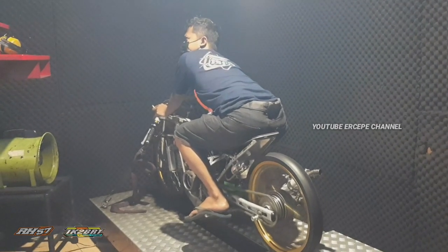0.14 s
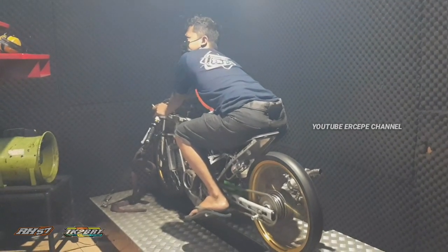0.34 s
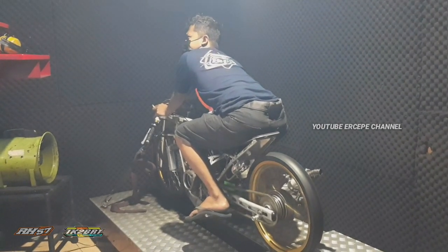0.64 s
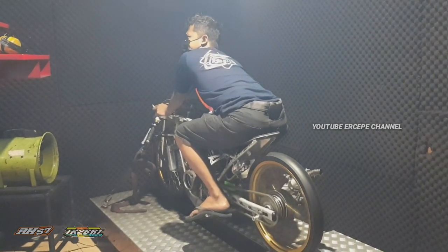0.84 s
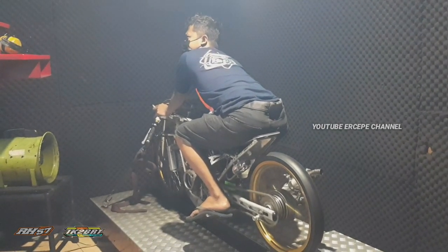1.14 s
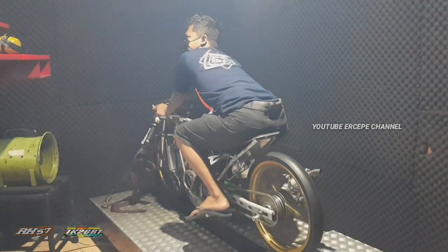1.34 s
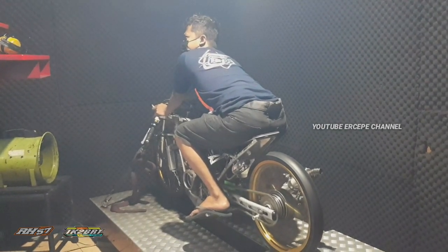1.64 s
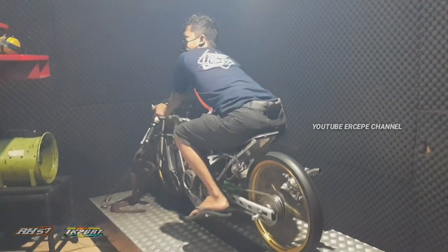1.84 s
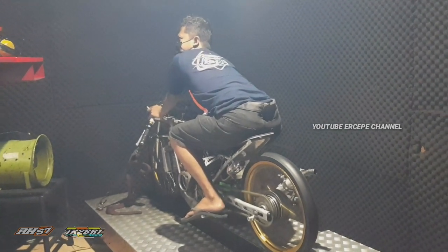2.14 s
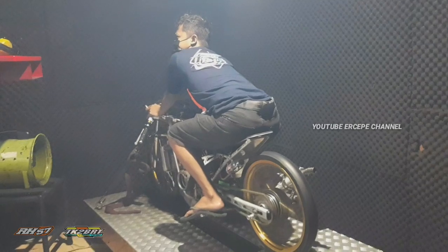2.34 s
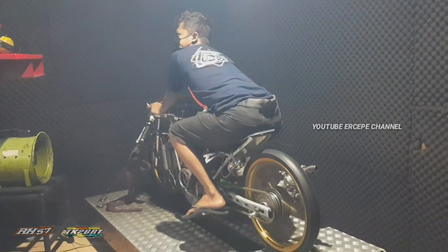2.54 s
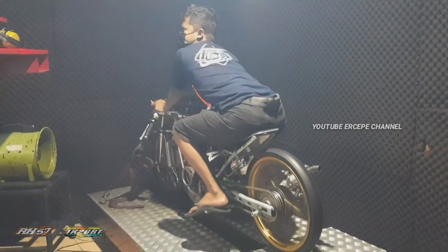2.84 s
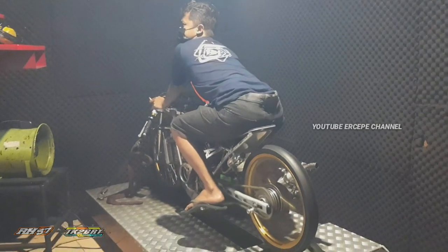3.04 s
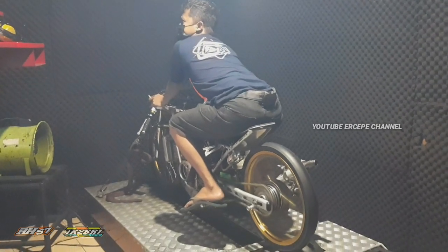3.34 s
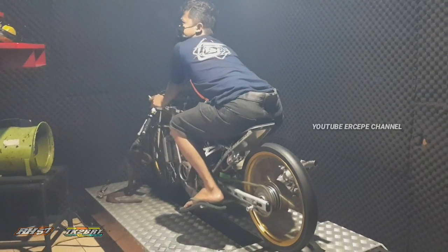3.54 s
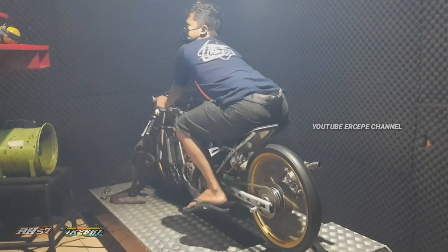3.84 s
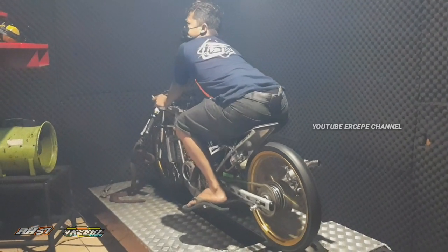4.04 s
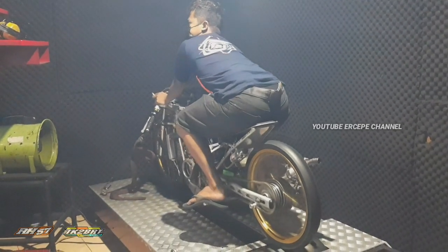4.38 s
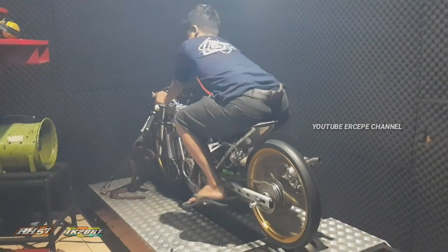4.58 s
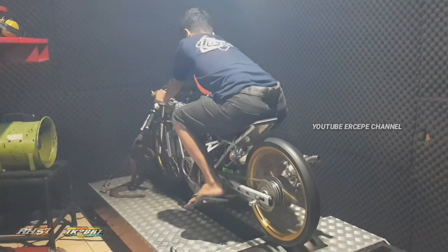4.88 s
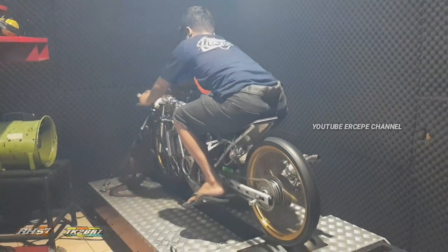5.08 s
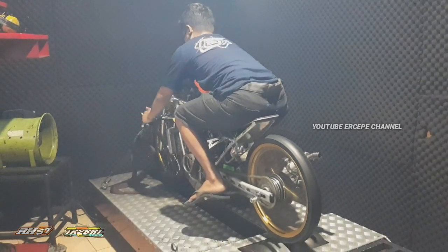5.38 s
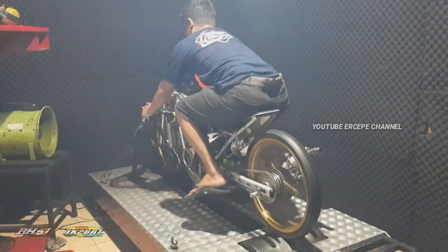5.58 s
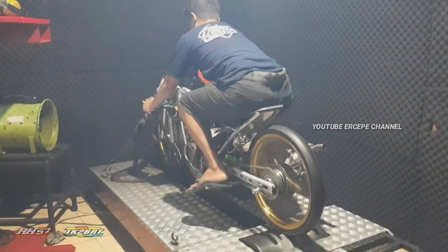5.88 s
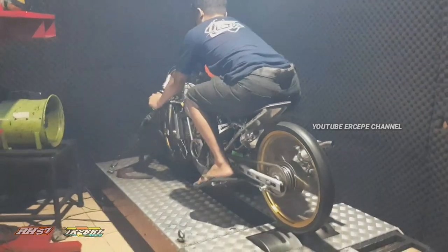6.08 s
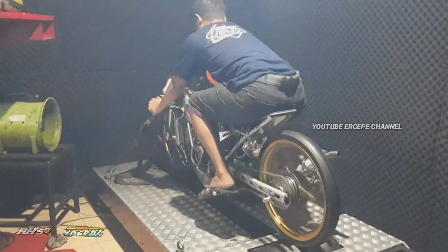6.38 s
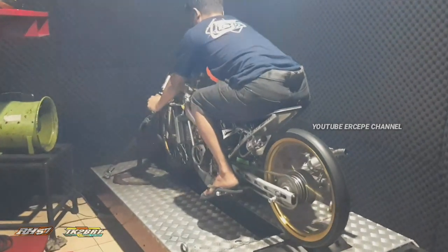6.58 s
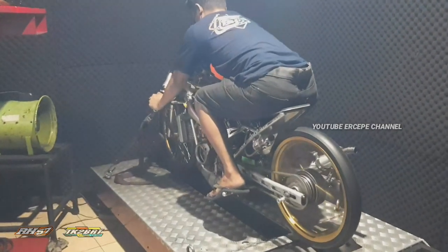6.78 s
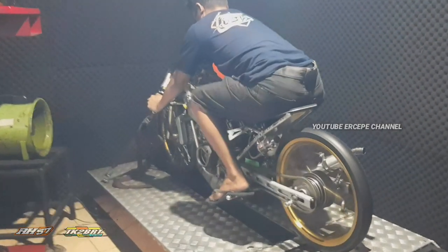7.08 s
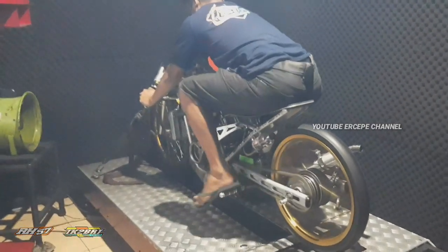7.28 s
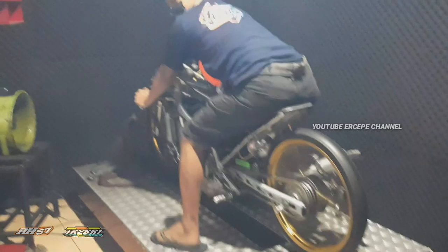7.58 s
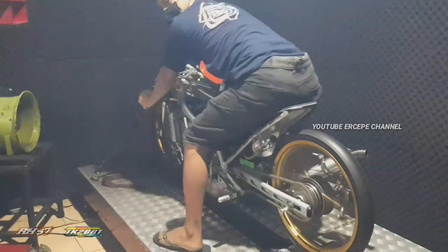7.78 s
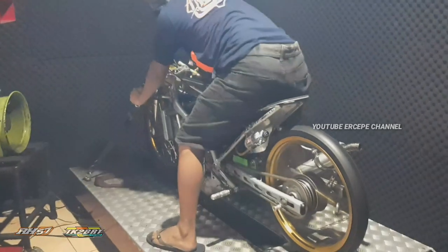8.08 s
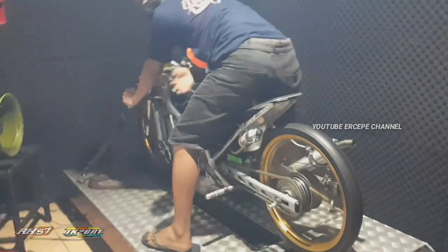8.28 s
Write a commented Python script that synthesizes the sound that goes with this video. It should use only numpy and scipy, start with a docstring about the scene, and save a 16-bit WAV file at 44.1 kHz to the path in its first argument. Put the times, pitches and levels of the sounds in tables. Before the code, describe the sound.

Close in a small padded room, a single-cylinder motorcycle pulls hard on a roller, its raspy buzzing howl climbing for about three seconds. The throttle snaps shut with a short low boom and a quick sag. A thinner, chattering whine holds high, sinking only slightly for three seconds. Then the load comes off and the pitch slides down by more than an octave, growing rougher, with ringing metal rattles. Stereo, dry, very short reflections.

```python
"""A single-cylinder motorcycle pulls hard on a roller dynamometer, heard by two microphones in a padded booth.
The revs climb, the throttle snaps shut, the heavy roller drags the engine on, and then the revs fall away.
Each firing is a pulse that rings pipe and booth, so its overtones sweep through fixed resonances.
Shaped noise gives gas rush and clatter; single overtones, rattles, knocks and one thump lie on top."""
import sys
import numpy as np
from scipy import signal
from scipy.fft import rfft, irfft, next_fast_len
from scipy.io import wavfile
from scipy.ndimage import uniform_filter1d

SR = 44100
rng = np.random.default_rng(int(sys.argv[2]) if len(sys.argv) > 2 else 0)


def master(y):
    """Save y as 16-bit WAV."""
    cut = np.clip(np.atleast_2d(y).T, -1, 1)
    pcm = np.round(cut * 32767)  # scale
    wavfile.write(sys.argv[1], SR, pcm.astype(np.int16))


N = 371315
TIME = np.arange(N) / SR
SIZE = next_fast_len(N + 8192)  # FFT length, with room for tails
HZ = np.fft.rfftfreq(SIZE, 1 / SR)
EDGE_HZ = 15450  # upper band limit
RELEASE_S = 6.05  # the load comes off

# Resonances and nulls of pipe and booth with the throttle shut.
# Each row: frequency in Hz, width in Hz, gain in dB at the left microphone, gain in dB at the right.
COAST_MODES = [(377, 43, 5.5, 3.5), (349, 27, 5, 5), (413, 12, -39, -26), (538.6, 21, 6, 12),
               (605, 11, 8, -5), (740, 17, 12, -46), (1022, 47, -14.5, 18.5), (1091, 10.2, -40, 9),
               (1186, 44, 9, 12.5), (1231.6, 122, 13.5, 12.5), (1354, 33, -18, -18),
               (1390, 310, -0.5, -9.5), (1654, 430, -10, -6), (1740, 51, 17.5, -5), (1744, 18, -13, 4),
               (1769, 58, 8, 7), (1923, 127, -32, -14.5), (2346, 130, 15, -13), (2390, 130, -9, -43),
               (2710, 39, 1, 1), (2850, 73, 6, 8), (3205, 160, -13, -17), (3580, 21, 12, -36),
               (3970, 300, 8, 9), (4260, 190, -14.5, -16), (4635, 150, 9.5, 3), (5000, 290, 6.5, 4),
               (5900, 150, 14, -2)]
# Resonances and nulls as the revs fall away.
# Each row: frequency in Hz, width in Hz, gain in dB at the left microphone, gain in dB at the right.
SLOW_MODES = [(201.4, 18, 11, 11), (302, 27, 7.5, 6), (337, 12, -13, -12), (371, 9.9, 8, 8),
              (531, 7.7, 9.5, 4.5), (562.6, 20, 9.5, 7.5), (627, 13, 5.5, 6.5), (739, 222, -15.5, -14),
              (880, 8.2, -5, -7), (976, 19, -34, -36), (1073, 22, -25, -3), (1166, 83, 5, 9.5),
              (1220, 55, 13.5, 11), (1304, 53, -5, -19), (1325, 227, -17, -20), (1413, 430, -12.5, -12.5),
              (1494, 23, 14.5, 22), (1610, 74, 15.5, 12), (1730, 140, 7, 1), (2070, 120, -6, 7),
              (2670, 340, 1.5, -7), (3320, 130, -22, -3.5), (3850, 64, 1, -6), (4130, 260, 1.5, 4.5),
              (4530, 290, -7, -17), (5100, 262.0, -8, -0.5), (5350, 300.0, 9, 0)]


def amp(db):
    """Decibels to gain."""
    return 10 ** (np.asarray(db) / 20)


def unit(x):
    """Scales to rms 1."""
    return x / np.sqrt(np.mean(x ** 2) + 1e-20)


def bump(at_s, width_s):
    """A smooth swell of height 1."""
    return np.exp(-((TIME - at_s) / width_s) ** 2)


def ramp(start_s, length_s):
    """Rises in a straight line from 0 to 1."""
    return np.clip((TIME - start_s) / length_s, 0, 1)


def curves(rows):
    """Each column after the time column, at every sample."""
    s, *columns = np.transpose(rows)
    return [np.interp(TIME, s, column) for column in columns]


def spectrum(points):
    """Joins points on a log-frequency axis."""
    hz, value = np.transpose(points)
    return np.interp(np.log(HZ + 1), np.log(hz), value)


def filtered(x, response):
    """Applies a frequency response."""
    return irfft(rfft(x, SIZE) * response, SIZE)[..., :N]


def above(hz, order=4):
    """Smooth high-pass response."""
    return HZ ** order / (HZ ** order + float(hz) ** order)


def wander(rate_hz):
    """Random drift of rms 1, slower than the given rate."""
    return unit(filtered(rng.standard_normal(N), 1 - above(rate_hz)))


def resonances(modes):
    """Gain in dB of bell-shaped peaks and nulls, one row per microphone."""
    total_db = 0
    for hz, width_hz, left_db, right_db in modes:
        bell = 1 / (1 + (2 * (HZ - hz) / width_hz) ** 2)
        total_db = total_db + np.array([[left_db], [right_db]]) * bell
    return total_db


def causal(db):
    """The response with this gain that rings only after it is struck (minimum phase)."""
    cepstrum = irfft(np.log(amp(db)), SIZE)
    cepstrum[:, 1:SIZE // 2] *= 2
    cepstrum[:, SIZE // 2 + 1:] = 0
    return np.exp(rfft(cepstrum))


def engine_speed():
    """Firings per second: the climb, the long coast with the roller, the fall."""
    # Engine speed under full throttle. Each row: time in seconds, firings per second.
    pull_speed = [(0.0, 132.9), (0.12, 132.7), (0.45, 140.9), (1.026, 158.8), (1.31, 168.9), (1.43, 174.8),
                  (2.147, 198.3), (2.594, 211.0), (2.875, 217.0)]
    # Engine speed once the load is off. Each row: time in seconds, firings per second.
    fall_speed = [(6.02, 177.8), (6.26, 160.5), (6.494, 146.9), (6.807, 130.0), (7.148, 114.8),
                  (7.526, 101.2), (8.42, 73.9)]
    # throttle shut: the revs drop to the pace of the roller, which loses a steady share of its speed
    roller_hz, roller_loss_per_s, drop_s = 204.8, 0.04485, 0.07
    top_s, top_hz = pull_speed[-1]
    since_s = np.maximum(TIME - top_s, 0)
    roller = roller_hz * np.exp(-roller_loss_per_s * since_s)
    drop = (top_hz - roller_hz) * np.maximum(1 - since_s / drop_s, 0)
    # slack in the chain lets the revs sag once before the roller takes hold
    sag = 6.5 * bump(3.01, width_s=0.052)
    (climb,), (fall,) = curves(pull_speed), curves(fall_speed)
    return np.select([TIME < top_s, TIME < fall_speed[0][0]], [climb, roller + drop - sag], fall)


def crank_turns(speed, shut, released):
    """Engine cycles turned so far, with wheel ripple, surges of the chain and small random drift."""
    firings_per_wheel_turn = 10.3
    wheel_phase = 2 * np.pi * np.cumsum(speed) / SR / firings_per_wheel_turn
    # the rear wheel nudges the revs once a turn; shares of the speed
    wheel = (1 - shut) * 0.0032 * np.sin(wheel_phase)
    # the revs surge gently, 5.15 times a second, while the roller drives the chain
    surge = shut * (1 - released) * 0.0025 * np.cos(2 * np.pi * 5.15 * (TIME - 3.85))
    drift = 0.000836 * wander(25.7)
    lead_s = 0.008  # the crankshaft runs ahead of its sound by the time spent in pipe and booth
    return np.cumsum(speed * (1 + wheel + surge + drift)) / SR + lead_s * (speed - speed[0])


def firings(turns, speed, uneven, jitter_ms):
    """One sharp pulse per engine cycle, each a little different in strength and timing."""
    at = np.interp(np.arange(1, int(turns[-1])), turns, np.arange(N))
    strength, late = rng.standard_normal((len(at), 2)).T
    # dividing by the speed keeps each overtone equally strong at any revs
    size = (1 + uneven * strength) * SR / speed[at.astype(int)] / np.sqrt(2)
    at = at + late * jitter_ms / 1000 * SR
    # windowed sinc: places a pulse between samples
    near = at.astype(int)[:, None] + np.arange(-8, 9)
    offset = near - at[:, None]
    shape = np.sinc(offset) * np.cos(np.pi * offset / 18) ** 2
    return np.bincount(np.clip(near, 0, N - 1).ravel(), (size[:, None] * shape).ravel(), N)


def wavering(pulses):
    """Faint echoes of drifting strength make each overtone swell and fade on its own."""
    out = pulses
    for delay_ms in (2.3, 4.1, 9.7):
        echo = filtered(pulses, np.exp(-2j * np.pi * HZ * delay_ms / 1000))
        out = out + 0.15 * wander(5) * echo
    return out


def smear():
    """Reflections hold each band back by its own few ms, which spreads a pulse over its cycle."""
    delay_s = .004 + .0025 * np.sin(2 * np.pi * HZ / 830) + .0015 * np.sin(2 * np.pi * HZ / 2170)
    return np.exp(-2j * np.pi * np.cumsum(delay_s) * SR / SIZE)


def microphones(lag_ms, from_hz=1900):
    """Treble reaches the right microphone later; the bass of the booth moves both together."""
    late = np.exp(-2j * np.pi * HZ * lag_ms / 1000 * above(from_hz, order=6))
    return np.array([np.ones(len(HZ)), late])


def booth(lag_ms, t60=0.38):
    """Direct sound plus a short spray of wall reflections."""
    # Share of the pulses' power scattered by the walls. Each row: frequency in Hz, share from 0 to 1.
    scatter = [(200, 0.08), (1200, 0.14), (2200, 0.17), (3500, 0.24), (7000, 0.6)]
    t = TIME[:SR // 5]
    tail = rng.standard_normal((2, len(t))) * amp(-60 * t / t60)
    tail /= np.linalg.norm(tail, axis=1, keepdims=True)
    share = np.clip(spectrum(scatter), 0, 1)
    return np.sqrt(1 - share) * microphones(lag_ms) + np.sqrt(share) * rfft(tail, SIZE)


def exhaust(pulses, effort, tone, modes, top_hz, lag_ms):
    """Pulses take their level and treble from the effort, then ring the pipe and the booth."""
    level_db, treble_db = effort
    treble = filtered(pulses, above(2000))
    drive = amp(level_db) * (pulses - treble + amp(treble_db) * treble)
    band = above(70, order=6) * (1 - above(top_hz, order=8))
    colour = causal(spectrum(tone) + resonances(modes)) * band
    return filtered(drive, colour * smear() * booth(lag_ms))


def rush(turns, levels, colour, modes, ring, throb, grain_db, lag_ms=0.38):
    """Noise that puffs once a cycle and rings the same resonances more weakly."""
    # Likeness of the noise at the two microphones. Each row: frequency in Hz, correlation from -1 to 1.
    likeness = [(60, 1), (300, 0.5), (1200, -0.55), (4000, 0.17), (10000, 0.24)]
    # Lean of the noise to one side. Each row: frequency in Hz, left minus right in dB.
    lean = [(60, 4), (300, 0.5), (1200, 1.5), (2500, -3), (6000, 3), (14000, 3.5)]
    grain = amp(grain_db * (wander(140) + .5 * wander(26)))
    puff = (1 + throb * np.cos(2 * np.pi * turns)) * grain
    first, second = rfft(rng.standard_normal((2, N)) * puff, SIZE)
    same = np.clip(spectrum(likeness), -1, 1)
    pair = np.array([first, same * first + np.sqrt(1 - same ** 2) * second]) * microphones(lag_ms)
    ring_db = resonances(modes)
    ring_db = ring_db - uniform_filter1d(ring_db.mean(0), size=6000)  # keeps the broad colour
    db = spectrum(colour) + ring * ring_db + spectrum(lean) * np.array([[.5], [-.5]])
    pair = pair * amp(db) * above(24)
    # three bands, each with its own level curve: roar, clatter, hiss
    over_roar, over_clatter = above(2200, order=12), above(7500, order=12)
    bands = [1 - over_roar, over_roar - over_clatter, over_clatter * (HZ < EDGE_HZ)]
    out = 0
    for band, level_db in zip(bands, levels):
        out = out + amp(level_db) * unit(irfft(pair * band, SIZE)[:, :N])
    return out


def under_load(speed, *laws):
    """Levels in dB that follow the revs and step up or down where the pipe comes into tune."""
    band_hz, band_width_hz = 170.7, 6.9  # firing rate of the power band
    octaves = np.log2(speed / band_hz)
    in_band = .5 + .5 * np.tanh((speed - band_hz) / band_width_hz)
    return [db + per_octave_db * octaves + band_db * in_band for db, per_octave_db, band_db in laws]


def off_load(speed, *laws):
    """Levels in dB that change by a fixed amount per octave of revs."""
    octaves = np.log2(speed / 129.2)
    return [db + per_octave_db * octaves for db, per_octave_db in laws]


def pull(turns, speed):
    """Full throttle: hard, hot pulses and a roar of gas."""
    # Broad colour of the pulses. Each row: frequency in Hz, relative overtone level in dB.
    power_tone = [(100.0, -33.5), (150.0, -43), (250.0, -48), (400.0, -41.5), (560.0, -29), (800.0, -35),
                  (1200.0, -10), (1800.0, -21.5), (2600.0, -28), (3800.0, -29), (5200.0, -40),
                  (7000.0, -46)]
    # Resonances and nulls of pipe and booth.
    # Each row: frequency in Hz, width in Hz, gain in dB at the left microphone, gain in dB at the right.
    power_modes = [(205, 9.1, -2, -21), (262, 68, 15, 5), (416, 13.5, -16, -3.5), (490.4, 4.4, -10, -40),
                   (588, 16.6, -15, 2.5), (677, 86, 9.5, 3), (820, 100, -6, 3), (867, 21, 17, 4.5),
                   (1040, 7.9, -2, -24), (1076, 25, -17.5, -1), (1181, 90, -5.5, -5.5),
                   (1226, 59, -5.5, -14.5), (1324, 66, 1.5, -7), (1541, 286, -23, -10.5),
                   (1628, 108, 16.5, 10), (1795, 8.9, 3, 12), (1964, 113, 6.5, -13.5), (2125, 39, -1, 2),
                   (2200, 160, -23, 8.5), (2382, 37, 10, -20), (2675, 170, 6, -7), (2710, 41, -14.5, -3),
                   (2870, 380, 6, 0), (3110, 380, -21.5, 0.5), (3300, 510, -3.5, -7),
                   (3387, 226, 7.5, 12.5), (3640, 310, -1, -11.5), (4800, 220, -11, 4.5),
                   (5620, 190, 10.5, 4)]
    # Colour of the gas and mechanical noise. Each row: frequency in Hz, relative density in dB per Hz.
    power_rush = [(30.0, -60), (80.0, -30), (160.0, -11.5), (300.0, -13.5), (550.0, -6.5), (800.0, -0.5),
                  (1200.0, 9.5), (1700.0, 3), (2700.0, -2), (4000.0, -3), (5600.0, -7.5), (8300.0, -16.5),
                  (11000.0, -12.5), (15000.0, -14)]
    # Brief rasps in the roar. Each row: time in seconds, swell in dB, width in seconds.
    rasps = [(.335, 9, 0.018), (2.885, 3, .025)]
    pulses = firings(turns, speed, uneven=0.12, jitter_ms=0.0016)
    # each law: base dB, dB per octave of revs, dB gained across the power band
    effort = under_load(speed, (-1.52, 8, -2.33), (1.6, 0.33, 3.8))  # pulses, treble
    roar_db, clatter_db, hiss_db = under_load(speed, (-26.8, 1.5, 2.2), (-25.5, 0, 1.7), (-33.5, 5.4, 2.3))
    for s, swell_db, width_s in rasps:
        roar_db = roar_db + swell_db * bump(s, width_s)
    note = exhaust(wavering(pulses), effort, power_tone, power_modes, top_hz=7900, lag_ms=0.3)
    gas = rush(turns, (roar_db, clatter_db, hiss_db), power_rush, power_modes,
               ring=0.024, throb=0.1, grain_db=0.5)
    return amp(2.5) * note + amp(4.5) * gas


def overrun(turns, speed):
    """Throttle shut: the roller spins the engine, which only pumps air."""
    # Broad colour of the pulses. Each row: frequency in Hz, relative overtone level in dB.
    coast_tone = [(100.0, -42), (150.0, -56), (250.0, -62.5), (400.0, -46), (560.0, -42), (800.0, -43),
                  (1200.0, -32.5), (1800.0, -24), (2600.0, -34.5), (3800.0, -35), (5200.0, -40.5),
                  (7000.0, -58)]
    # Strength of the pulses. Each row: time in seconds, relative level in dB, extra treble in dB.
    strength_rows = [(2.925, -7.5, 10), (2.945, -1.5, 3), (3.4, -1, 1), (3.9, 0, -2), (4.25, 5, -4.5),
                     (4.95, 2.5, 2), (5.55, 2.5, 2), (6.0, -1, 3)]
    pulses = firings(turns, speed, uneven=0.077, jitter_ms=0.0026)
    note = exhaust(pulses, curves(strength_rows), coast_tone, COAST_MODES, top_hz=8700, lag_ms=0.335)
    return amp(0.5) * note


def run_down(turns, speed):
    """With the load off the pulses fade with the revs, on a less even beat."""
    # Broad colour of the pulses. Each row: frequency in Hz, relative overtone level in dB.
    slow_tone = [(100.0, -60), (150.0, -69), (250.0, -51.5), (400.0, -53.5), (560.0, -38), (800.0, -35),
                 (1200.0, -29.5), (1800.0, -37.5), (2600.0, -41.5), (3800.0, -39), (5200.0, -44.5),
                 (7000.0, -52.5)]
    # each law: base dB, dB per octave of revs
    level_db, treble_db = off_load(speed, (1.44, 12.7), (3.2, -1))
    # near idle the cylinder takes hold again, in the lower overtones
    catch_db = 5.5 * ramp(7.06, 0.73)
    effort = level_db + catch_db, treble_db - catch_db
    pulses = firings(turns, speed, uneven=0.13, jitter_ms=0.016)
    return amp(0.25) * exhaust(wavering(pulses), effort, slow_tone, SLOW_MODES, top_hz=7600, lag_ms=0.457)


def overtone(sound, turns, s, half_s, number, settle_s):
    """One overtone around a moment: its place, carrier, slow amplitude, and a flat-topped swell."""
    near = slice(max(int((s - 2 * half_s) * SR), 0), int((s + 2 * half_s) * SR))
    carrier = np.exp(2j * np.pi * round(number) * turns[near])
    window = np.hanning(int(settle_s * SR))
    slow = signal.fftconvolve(sound[:, near] / carrier, window[None] / window.sum(), "same", axes=1)
    swell = np.exp(-((TIME[near] - s) / half_s) ** 4)
    return near, carrier, slow, swell


def whines(sound, turns):
    """An overtone in tune with pipe or booth builds up in step with itself; others sink for a moment."""
    # Overtones that ring out as the revs pass a resonance.
    # Each row: time in seconds, half length in seconds, overtone number, added level in dB.
    whine_rows = [(0.06, 0.074, 10, -18.5), (0.083, 0.18, 3, -35.5), (.15, 0.11, 1, -45),
                  (.15, 0.83, 4, -29.5), (0.254, 0.18, 19, -25), (.26, .07, 11, -26), (.4, 0.061, 24, -26),
                  (.5, .07, 27, -31), (0.277, 0.032, 10, -41), (.46, .07, 8, -23), (0.51, 0.062, 5, -38),
                  (0.597, 0.14, 18, -25), (0.64, 0.28, 6, -22), (0.817, 0.15, 1, -35),
                  (0.853, 0.24, 11, -19.5), (0.9, 0.04, 16, -28), (.97, 0.085, 2, -38),
                  (1.122, 0.091, 10, -26), (1.337, 0.082, 2, -51), (1.353, 0.16, 10, -17.5),
                  (1.508, 0.065, 7, -41), (1.515, .15, 19, -23), (1.733, 0.081, 8, -30),
                  (1.74, 0.051, 4, -26.5), (1.764, 0.12, 10, -18), (1.85, 0.14, 18, -25.5),
                  (1.957, .1, 4, -27.5), (1.972, .1, 14, -28), (1.977, 0.66, 6, -23.5),
                  (2.022, 0.043, 9, -35), (2.03, 0.096, 2, -41), (2.105, .11, 1, -44),
                  (2.156, 0.23, 11, -30), (2.174, 0.18, 5, -28), (2.18, 0.13, 18, -38),
                  (2.18, 0.16, 17, -34), (2.2, .13, 28, -36), (2.337, 0.14, 9, -16),
                  (2.497, 0.083, 13, -28), (2.52, .1, 17, -35), (2.58, .14, 7, -37), (2.62, .12, 15, -31),
                  (2.698, 0.21, 8, -15), (2.722, 0.19, 6, -23), (2.68, 0.14, 16, -37), (2.8, 0.1, 24, -27),
                  (2.8, 0.081, 26, -31), (2.84, 0.045, 10, -22), (2.954, 0.013, 6, -20),
                  (3.173, 0.14, 9, -33), (3.282, 0.21, 6, -33), (3.207, 0.23, 17, -39),
                  (3.413, 0.12, 20, -20.5), (3.5, .12, 21, -31), (3.6, 0.22, 2, -49), (3.9, 0.12, 23, -33),
                  (3.96, 0.15, 13, -37), (4.05, 0.11, 21, -28), (4.394, 0.15, 21, -20), (4.4, .2, 1, -54),
                  (4.53, .16, 22, -30), (4.72, 0.19, 8, -34.5), (4.798, 0.14, 11, -24),
                  (4.853, 0.16, 10, -26.5), (4.953, .08, 25, -21), (5.1, 0.13, 28, -33),
                  (5.037, 1, 10, -32.5), (5.11, 0.14, 9, -35), (5.183, 0.21, 6, -22.5),
                  (5.23, 0.087, 21, -25.5), (5.3, 0.3, 14, -30), (5.42, 0.14, 23, -20),
                  (5.443, 0.18, 10, -27), (5.548, 0.22, 25, -34), (5.703, 0.065, 20, -25),
                  (5.753, 0.16, 17, -27.5), (5.794, .16, 14, -24), (5.8, 0.1, 6, -55), (5.8, 0.22, 19, -26),
                  (5.852, 0.26, 7, -24.5), (5.94, 0.15, 21, -24), (6.02, 0.031, 15, -22),
                  (6.01, 0.04, 14, -19), (6.136, 0.071, 7, -18), (6.137, 0.052, 6, -28),
                  (6.202, .07, 15, -29), (6.238, .08, 3, -40), (6.29, 0.09, 4, -35), (6.336, 0.05, 8, -27),
                  (6.34, 0.093, 24, -26), (6.495, 0.11, 8, -25.5), (6.53, .06, 13, -26),
                  (6.557, 0.067, 7, -25), (6.693, 0.066, 9, -40), (6.86, 0.1, 9, -27),
                  (6.902, 0.062, 12, -28), (6.954, 0.057, 5, -38), (7.051, 0.045, 10, -31),
                  (7.12, 0.22, 1, -54), (7.178, 0.039, 14, -37), (7.181, 0.13, 5, -43.5),
                  (7.42, 0.052, 15, -30), (7.88, 0.073, 17, -37), (7.88, 0.23, 6, -40.5),
                  (7.91, 0.13, 4, -45), (7.938, 0.054, 14, -21), (8.033, 0.16, 2, -48),
                  (8.386, 0.045, 4, -46)]
    # Overtones that sink for a moment.
    # Each row: time in seconds, half length in seconds, overtone number.
    fade_rows = [(0.367, 0.13, 16), (0.415, .11, 1), (.43, .13, 3), (.65, .08, 19), (.72, 0.12, 2),
                 (0.844, .07, 5), (1.078, 0.11, 14), (1.27, 0.16, 20), (1.29, 0.2, 18), (1.49, 0.062, 11),
                 (1.58, 0.046, 4), (1.607, 0.061, 9), (1.647, 0.13, 3), (1.78, 0.13, 2), (1.82, 0.099, 15),
                 (1.93, .18, 17), (1.96, 0.26, 13), (2.2, 0.086, 14), (2.217, 0.14, 12), (2.33, 0.054, 1),
                 (2.336, 0.072, 10), (4.166, 0.17, 12), (4.446, 0.12, 11), (5.55, 0.33, 22),
                 (5.75, 0.13, 21), (5.934, 0.085, 13)]
    settle_s, fade_db = 0.1, -12
    out = np.zeros((2, N))
    for s, half_s, number, db in whine_rows:
        near, carrier, slow, swell = overtone(sound, turns, s, half_s, number, settle_s + half_s)
        rms = np.sqrt(np.mean(abs(slow) ** 2, axis=0) / 2 + 1e-20)
        out[:, near] += amp(db) * swell * (carrier * slow).real / rms
    for s, half_s, number in fade_rows:
        near, carrier, slow, swell = overtone(sound, turns, s, half_s, number, settle_s)
        out[:, near] -= (1 - amp(fade_db)) * swell * 2 * (carrier * slow).real
    return out


def clatter(turns):
    """Valve gear and chain with no load: a bright rush that turns into a ringing rattle."""
    # Colour of the noise at high revs. Each row: frequency in Hz, relative density in dB per Hz.
    coast_rush = [(30.0, -41), (80.0, -26.5), (160.0, -22), (450.0, -18.5), (800.0, -10.5), (1150.0, 5),
                  (1700.0, -1.5), (2700.0, 9), (4000.0, 11), (5400.0, 1.5), (6600.0, -7), (8300.0, -26.5),
                  (11000.0, -26.5), (15000.0, -29.5)]
    # Colour of the noise at low revs. Each row: frequency in Hz, relative density in dB per Hz.
    slow_rush = [(30.0, -51), (80.0, -27.5), (300.0, -24), (750.0, -20), (1150.0, -8.5), (1380.0, 2),
                 (1600.0, -7.5), (1900.0, -8.5), (3400.0, -7), (4100.0, -5), (4700.0, -12), (6600.0, -19.5),
                 (8300.0, -20), (10500.0, -15.5), (15000.0, -21)]
    # Relative noise levels, throttle shut. Each row: time in seconds, roar in dB, clatter in dB, hiss in dB.
    shut_noise = [(2.9, -19, -25, -30), (3.03, -27, -24.5, -33), (3.85, -26, -23.5, -33),
                  (5.0, -22, -19.5, -27.5), (6.1, -22, -19, -33), (6.95, -25, -23.5, -33),
                  (7.65, -20, -19, -30), (8.42, -19, -16.5, -29)]
    slowed = ramp(RELEASE_S, 1)  # the colour changes over a second
    levels = curves(shut_noise)
    fast = rush(turns, levels, coast_rush, COAST_MODES, ring=0.051, throb=0.023, grain_db=0.77)
    slow = rush(turns, levels, slow_rush, SLOW_MODES, ring=.35, throb=.45, grain_db=.9)
    return np.sqrt(1 - slowed) * amp(-0.5) * fast + np.sqrt(slowed) * amp(-4.3) * slow


def knocks(turns):
    """After the load comes off, some firings strike loose metal: each part by chance, with its own force."""
    # Ringing parts. Each row: frequency in Hz, level in dB, t60 in seconds.
    knock_modes = [(1538, -35, .07), (1670, -37.5, 0.083), (2630, -44, 0.056), (3080, -34.5, 0.1),
                   (3760, -40.5, 0.063), (4150, -36, 0.1), (4500, -50, 0.051)]
    share, spread_db = .3, 4.5
    at = np.flatnonzero(np.diff(np.floor(turns)) > 0)
    t, out = TIME[:SR // 12], np.zeros((2, N))
    for hz, db, t60 in knock_modes:
        part = np.zeros((2, N + len(t)))
        for i in at[rng.random(len(at)) < share]:
            force, detune, side = np.clip(rng.standard_normal(3), -2, 2)
            if TIME[i] > RELEASE_S:
                # the right microphone hears it at a random phase offset
                phase = 2 * np.pi * hz * (1 + 0.016 * detune) * t + np.array([[0], [side]])
                part[:, i:i + len(t)] += amp(spread_db * force - 60 * t / t60) * np.sin(phase)
        out += amp(db) * part[:, :N] / np.std(part[:, int(RELEASE_S * SR):N])
    return out


def rattles(turns):
    """Brief rattles and spits: bands of noise, beaten at the firing rate."""
    # Each row: time in seconds, half length in seconds, centre in Hz, width in Hz, level in dB.
    rattle_rows = [(0.349, 0.015, 2700, 1200, -18), (2.919, .025, 720, 696, -30.5),
                   (2.934, 0.016, 2000, 1200, -27), (2.973, 0.028, 4000, 300, -24),
                   (3.065, .018, 3400, 160, -32), (3.082, 0.019, 4040, 162, -22.5),
                   (6.112, .02, 3600, 300, -23), (6.222, 0.021, 3700, 400, -18),
                   (6.357, .035, 3830, 300, -24), (7.511, .02, 1530, 295, -24),
                   (7.752, 0.011, 1300, 700, -24), (7.888, .022, 1440, 500, -27),
                   (7.93, 0.013, 3930, 700, -21.5), (8.281, 0.026, 1580, 250, -25)]
    out = np.zeros((2, N))
    for s, half_s, centre_hz, width_hz, db in rattle_rows:
        near = slice(max(int((s - 2 * half_s) * SR), 0), int((s + 2 * half_s) * SR))
        t = TIME[near]
        band = np.exp(-(2 * (np.fft.rfftfreq(len(t), 1 / SR) - centre_hz) / width_hz) ** 2)
        # part separate at each microphone, part shared
        noise = rng.standard_normal((2, len(t))) + rng.standard_normal(len(t))
        noise = irfft(rfft(noise) * band, len(t))
        beaten = unit(noise * (1 + .5 * np.cos(2 * np.pi * turns[near])))
        out[:, near] += amp(db) * np.exp(-((t - s) / half_s) ** 2) * beaten
    return out


def thump():
    """The gas cut off by the throttle gives one short, low boom: a tone with a little rumble."""
    boom_hz = 213
    boom = np.sqrt(2) * np.sin(2 * np.pi * boom_hz * TIME) + amp(-26) * wander(boom_hz)
    return amp(-33) * bump(2.917, width_s=0.023) * boom


def flickering(sound):
    """Patches of the treble swell and sink on their own."""
    patch_db, full_from_hz, patch_hz, patch_s = 1.5, 2400, 340, .06
    hz, _, z = signal.stft(sound, SR, nperseg=512)
    field = uniform_filter1d(rng.standard_normal(z.shape[1:]), round(patch_hz / hz[1]), 0)
    field = unit(uniform_filter1d(field, round(2 * patch_s * hz[1]), 1))
    gain = amp(patch_db * field * np.clip(hz / full_from_hz, 0, 1)[:, None] ** 2)
    gain = gain / np.sqrt(np.mean(gain ** 2, 1, keepdims=True))
    return signal.istft(z * gain, SR, nperseg=512)[1][:, :N]


def scene():
    """One crankshaft turns through the pull, the overrun and the run-down."""
    shut_s, shut_takes_s, release_takes_s = 2.902, 0.024, 0.073
    speed = engine_speed()
    shut = np.clip(.5 + (TIME - shut_s) / shut_takes_s, 0, 1)
    released = np.clip(.5 + (TIME - RELEASE_S) / release_takes_s, 0, 1)
    turns = crank_turns(speed, shut, released)
    unloaded = np.sqrt(1 - released) * overrun(turns, speed) + np.sqrt(released) * run_down(turns, speed)
    engine = (1 - shut) * pull(turns, speed) + shut * (unloaded + clatter(turns))
    engine = flickering(engine)
    # a share of the bass drops out briefly as the load comes off
    bass = filtered(engine, 1 - above(760))
    engine = engine - .65 * bump(6.11, width_s=.055) * bass
    return engine + whines(engine, turns) + thump() + rattles(turns) + knocks(turns)


def record(dry):
    """Limits peaks to full scale; then the band limit."""
    clipped = np.clip(dry, -1, 1)
    low_pass = signal.firwin(511, EDGE_HZ, window=("kaiser", 9), fs=SR)
    return signal.oaconvolve(clipped, low_pass[None], "same")


dry = scene()
out = record(dry)
master(out)
```